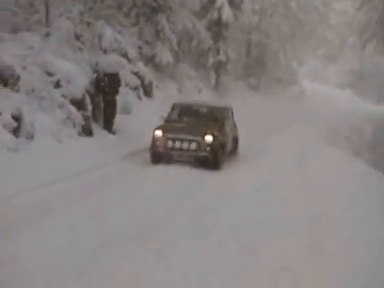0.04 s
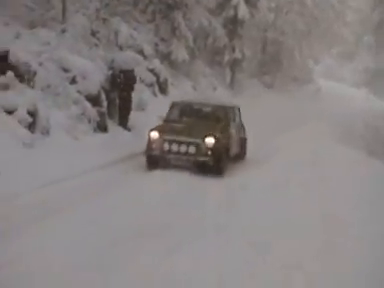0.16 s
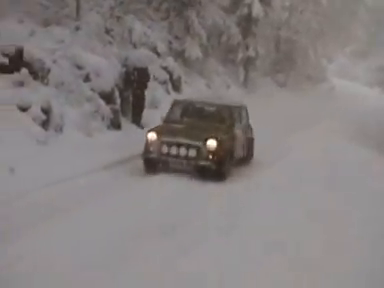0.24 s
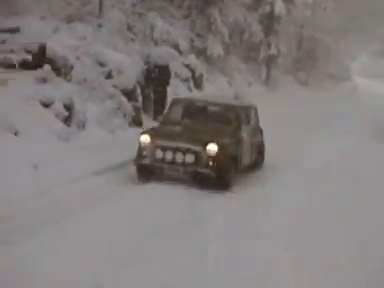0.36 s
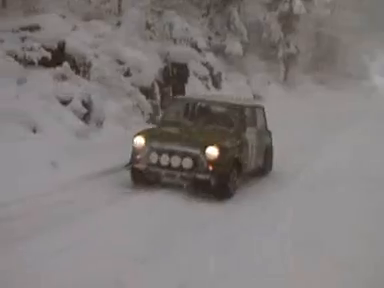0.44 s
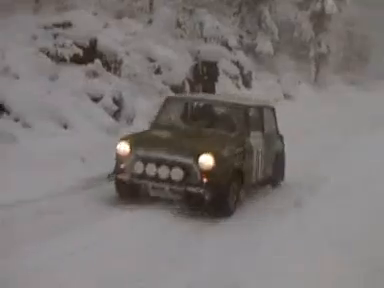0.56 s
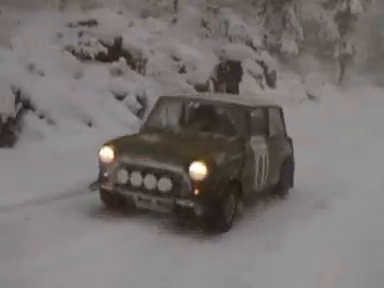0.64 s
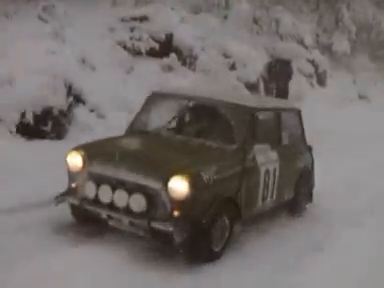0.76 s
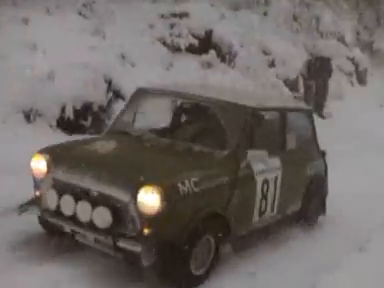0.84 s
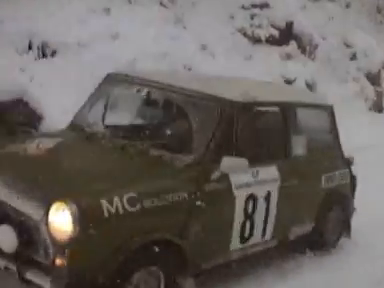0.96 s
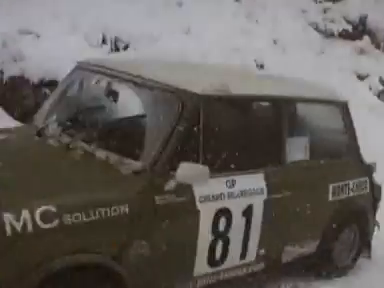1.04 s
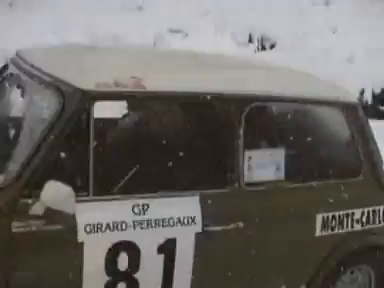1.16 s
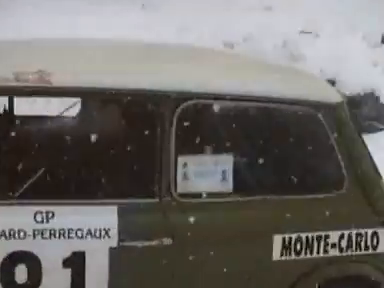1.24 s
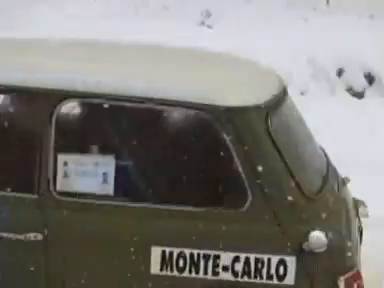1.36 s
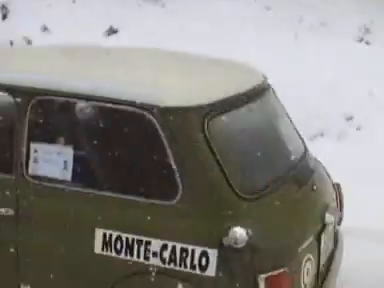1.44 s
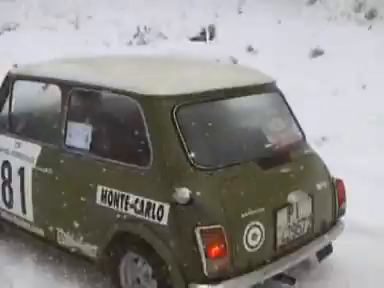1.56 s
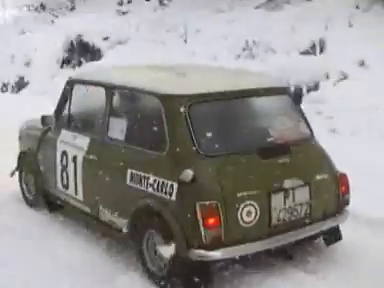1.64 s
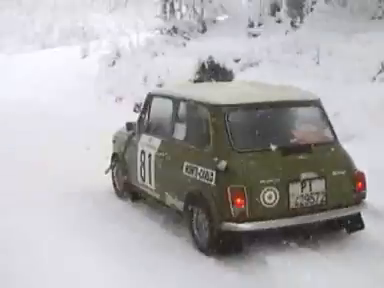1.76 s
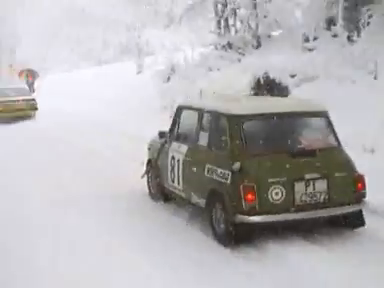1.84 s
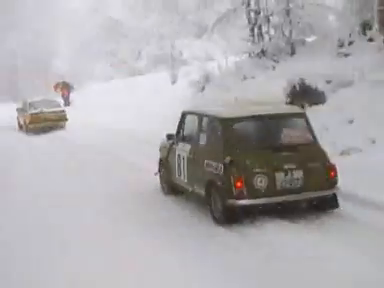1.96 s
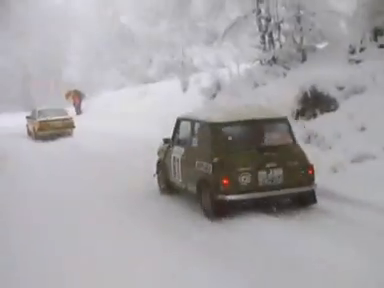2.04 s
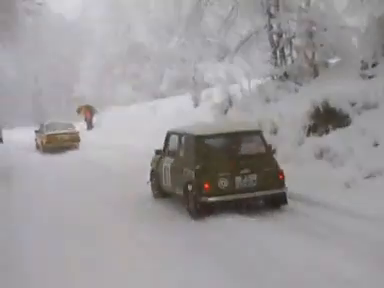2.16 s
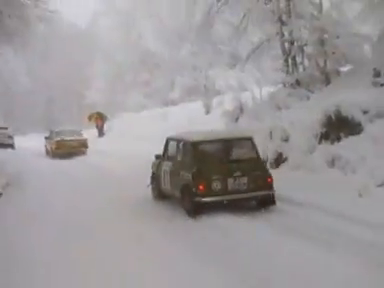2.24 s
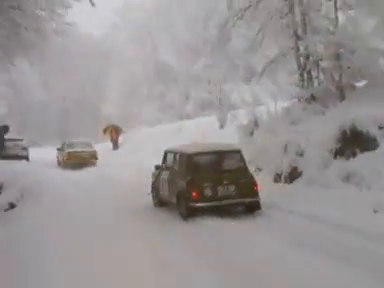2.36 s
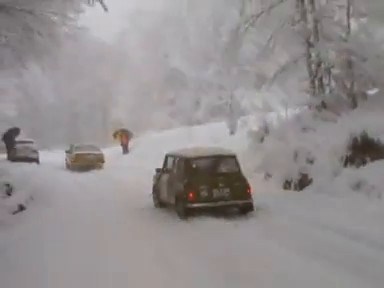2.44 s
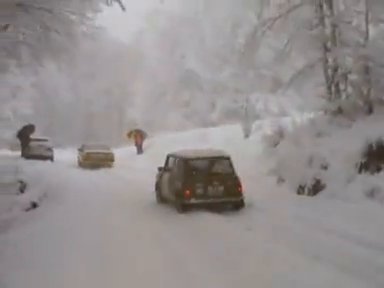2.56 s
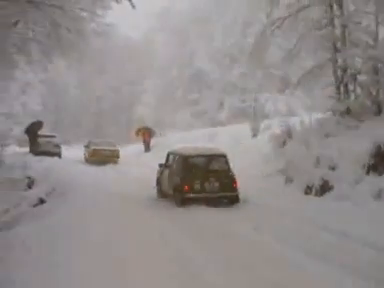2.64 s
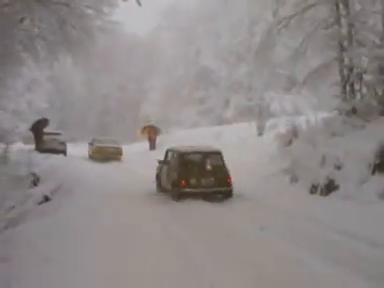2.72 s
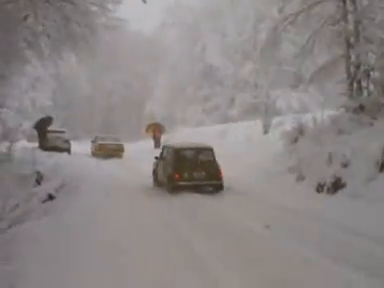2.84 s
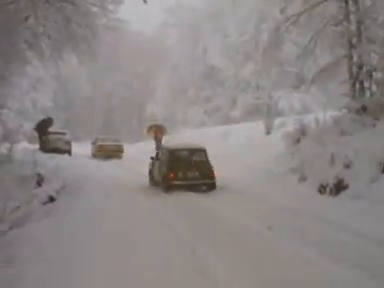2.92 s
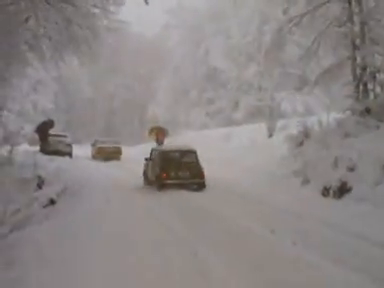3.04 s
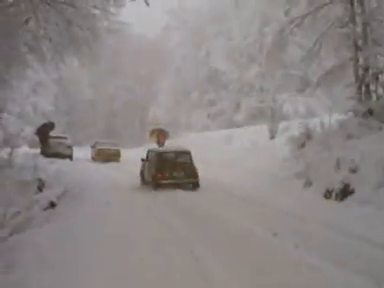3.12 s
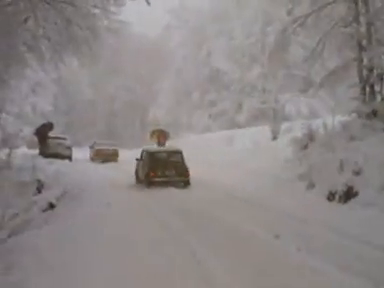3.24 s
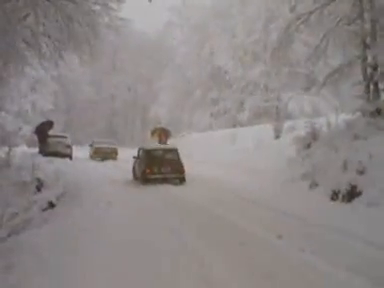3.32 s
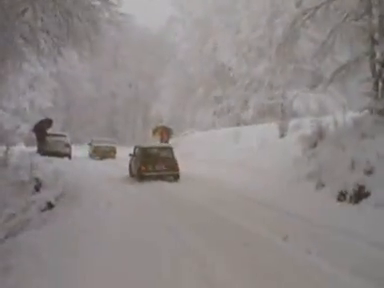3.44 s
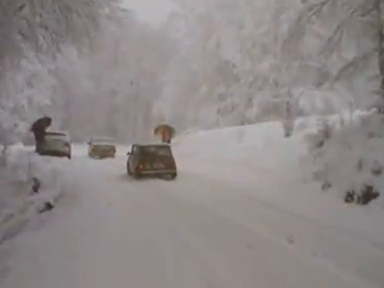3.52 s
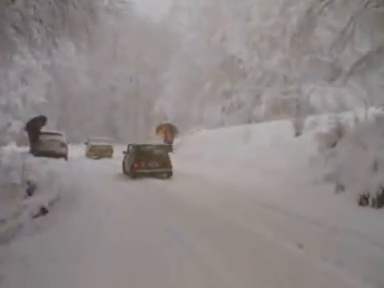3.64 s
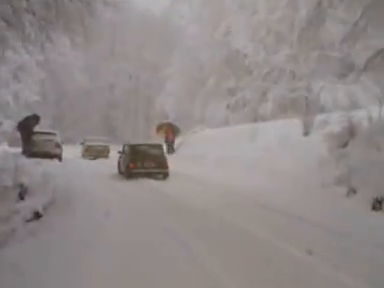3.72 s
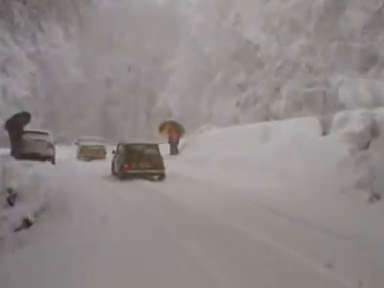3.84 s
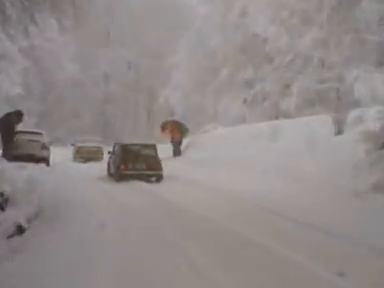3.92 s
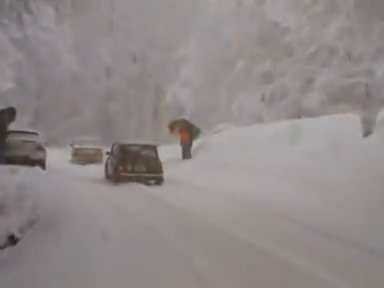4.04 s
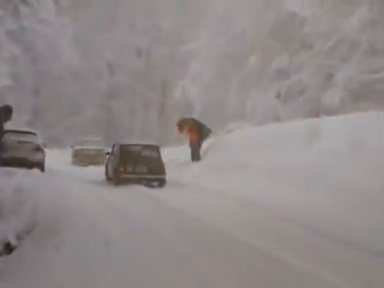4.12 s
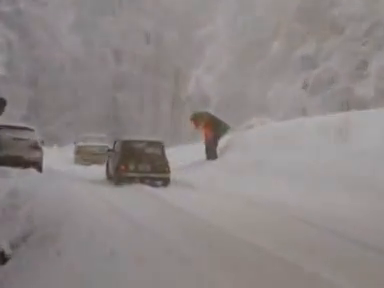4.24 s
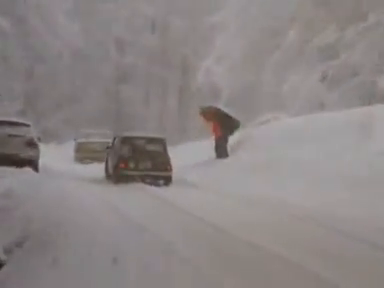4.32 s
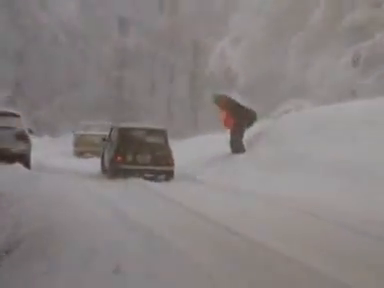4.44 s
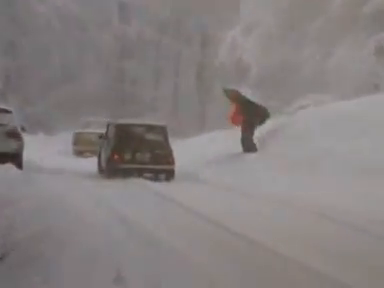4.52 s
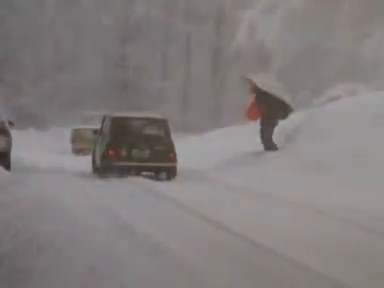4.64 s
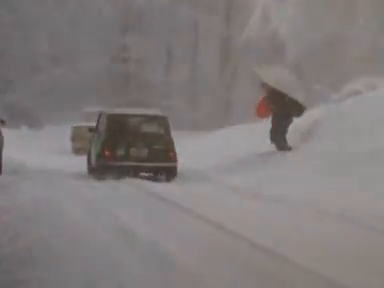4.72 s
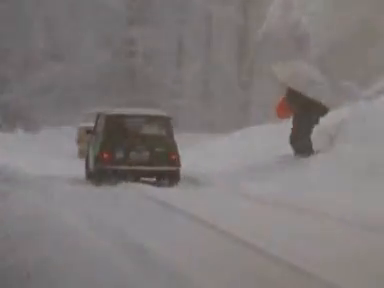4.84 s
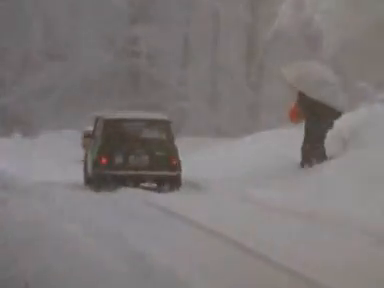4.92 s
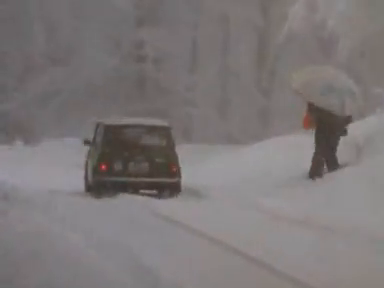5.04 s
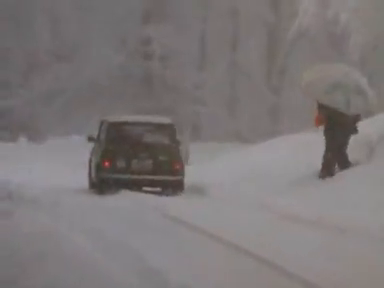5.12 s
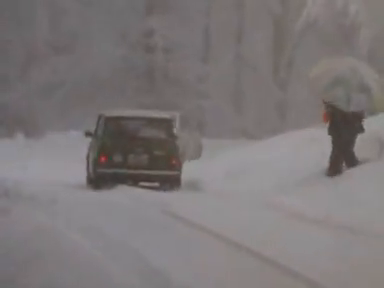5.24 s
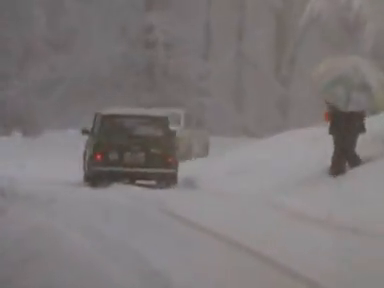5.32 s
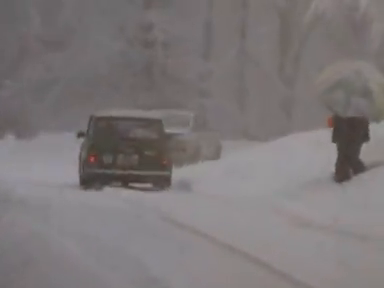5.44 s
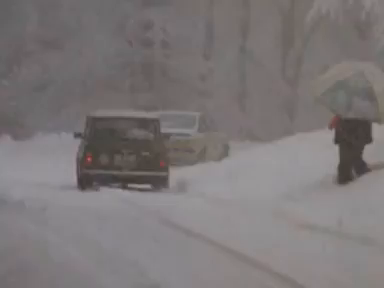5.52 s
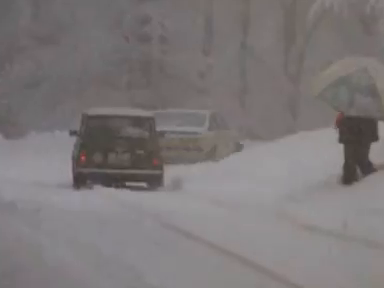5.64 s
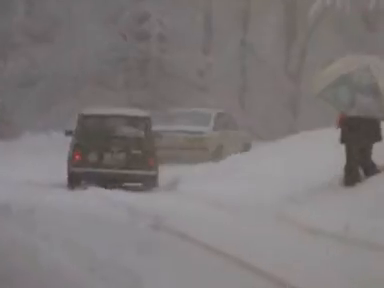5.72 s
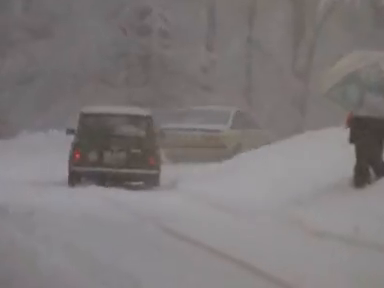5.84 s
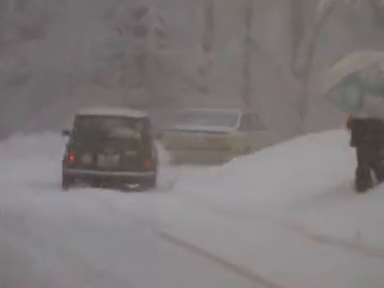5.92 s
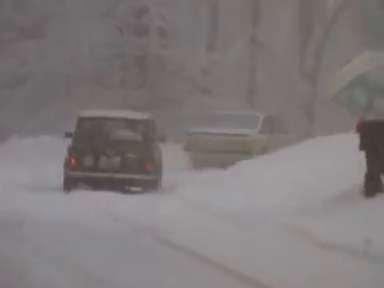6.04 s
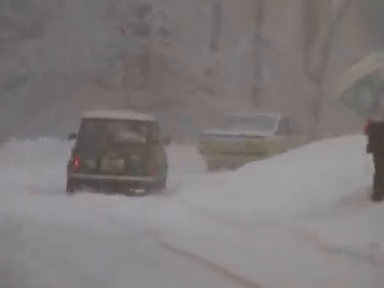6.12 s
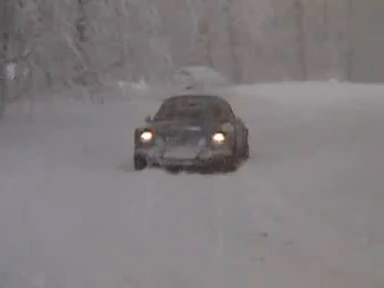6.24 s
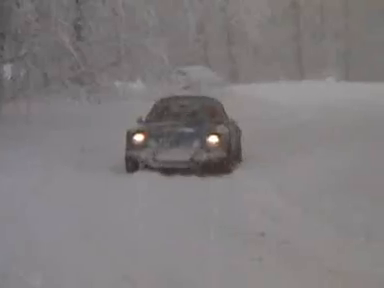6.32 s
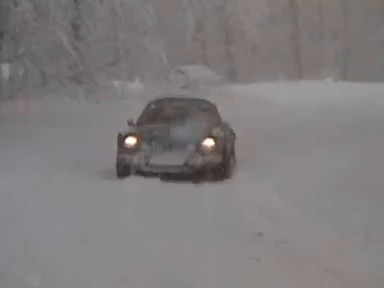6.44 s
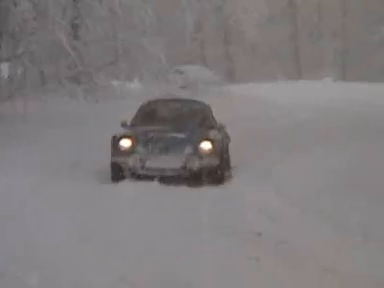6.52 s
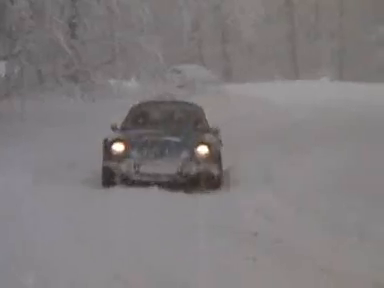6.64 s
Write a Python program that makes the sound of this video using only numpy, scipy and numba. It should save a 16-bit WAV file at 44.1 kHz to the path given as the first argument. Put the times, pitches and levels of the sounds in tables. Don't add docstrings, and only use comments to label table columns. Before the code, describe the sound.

Low raspy four-cylinder drones throb against each other, swell with gear whine and snow hiss, drop away, then cut to a distant higher engine.

```python
import sys
import numpy as np
from scipy import signal
from scipy.fft import irfft, next_fast_len
from scipy.io import wavfile
from scipy.ndimage import uniform_filter1d
from numba import njit

SR = 44100
rng = np.random.default_rng(int(sys.argv[2]) if len(sys.argv) > 2 else 0)


def store_pcm(level_fs):
    pcm = np.round(np.clip(level_fs, -1, 1) * 32767).astype(np.int16)
    wavfile.write(sys.argv[1], SR, np.atleast_2d(pcm).T)


def volts(x):
    e = np.asarray(x, float) / 20
    return 10 ** e


N = 294147
T = np.arange(N) / SR

CRANK = (.73, .83, .18)
# time of one crack in seconds, level against the
# note in dB, width in seconds.
CRACKS = [
    (.2163, 4, .00042),
    (2.7066, -10, .0004),
]


def curves(table):
    times, *columns = np.transpose(table)
    return [np.interp(T, times, column) for column in columns]


def walk(rate):
    hold = int(SR / rate)
    steps = np.repeat(rng.standard_normal(N // hold + 1), hold)
    return uniform_filter1d(uniform_filter1d(steps, hold), hold)[:N]


def band(hz, octaves):
    size = next_fast_len(N)
    f = np.arange(1, size // 2 + 2) * SR / size
    bell = np.exp(-(np.log2(f / hz) / octaves) ** 2)
    phase = np.exp(2j * np.pi * rng.random(len(f)))
    noise = irfft(bell * phase * rng.rayleigh(size=len(f)), size)[:N]
    return noise / noise.std()


def bumps(table):
    return sum(db * np.exp(-((T - s) / length) ** 2) for s, length, db in table)


def peaks(hz, table):
    return sum(db * np.exp(-(np.log2(hz / f) / octaves) ** 2) for f, octaves, db in table)


def gate_of(db):
    return 1 / (1 + np.exp(-np.clip(db, -30, 30)))


def engine(rate, crank, heard, pipe, lag, waver_db, jitter, boom_db=0):
    hz, = curves(rate)
    running = T >= rate[0][0]
    angle = 2 * np.pi * (crank + np.cumsum(hz * running) / SR)
    note_db, octave_db = curves(heard)
    upper_db = 2 + 0.58 * octave_db
    out, shake = 0, walk(25)
    for order, db in pipe:
        order = np.round(order * 4) / 4
        spread = np.abs(order - 1)
        late = lag * spread if order % 1 == 0 else 2 * np.pi * rng.random()
        if order == 2:
            db = octave_db
        else:
            boom_share = (order == 3) + .35 * (order > 3)
            db = db + (order > 2) * upper_db + boom_db * boom_share
        db = db + waver_db * min(spread + .2, 2.) * (.7 * walk(14) + .5 * walk(45))
        out = out + volts(db) * np.cos(order * angle - late + jitter * spread * shake)
    return np.sqrt(2) * volts(note_db) * out, angle


def cracks(angle, heard, s, db, width_s):
    turns = (angle - angle[int(s * SR)]) / (2 * np.pi)
    age = ((turns + 1) % 2 - 1) / (np.gradient(turns) * SR * width_s)
    strong = np.where((turns + 1) % 4 < 2, 1, .55)
    note_db, rasp_db = curves(heard)
    level_db = note_db + db + .4 * np.minimum(rasp_db, -2) + 2.5 * walk(30)
    return strong * (age - .7) * np.exp(-age ** 2 / 2) * volts(level_db)


def first_car():
    # time in seconds, firing rate in Hz.
    firing = [(0.0, 103.46), (0.44, 98.47), (0.78, 96.77), (0.88, 94.3), (1.61, 91.87), (3.77, 89.58),
              (4.3, 88.11), (4.54, 86.36), (4.76, 90.69), (4.93, 86.93), (5.25, 88.14), (5.44, 86.8),
              (5.59, 88.92), (6.29, 84.27)]
    # time in seconds, note level in dB, rasp (octave against the note) in dB.
    heard = [(0, -7.5, 4), (.17, -3.5, -1), (.45, -4.5, -4), (.85, -9.5, -5), (1.19, -13.5, -7.5),
             (1.36, -29, -4), (1.7, -17.5, -6), (2.2, -21.5, 1), (2.4, -16, -9), (2.85, -21.5, -10),
             (3.1, -25, -14), (3.4, -29, -8.5), (4.2, -34, -6.5), (5.1, -38, 0), (6.29, -42, -8)]
    # multiple of the firing rate, level in dB.
    pipe = [(0.5, -27), (0.75, -24), (1.0, 2.5), (1.25, -16), (1.5, -15.5), (1.75, -40.5), (2.0, -9),
            (2.25, -17), (2.5, -15), (2.75, -24), (3.0, -15.5), (3.25, -23.5), (3.5, -17.5), (3.75, -33),
            (4.0, -20.5), (4.25, -23.5), (4.5, -26), (4.75, -27), (5.0, -29), (5.25, -53), (5.5, -38.5),
            (5.75, -23.5), (6.0, -29.5), (6.25, -29), (6.5, -55), (6.75, -40.5), (7.0, -48)]
    note, angle = engine(firing, CRANK[0], heard, pipe, lag=.6, waver_db=1., jitter=.06)
    return note + cracks(angle, heard, *CRACKS[0]), angle


def second_car():
    # time in seconds, firing rate in Hz.
    firing = [(0.0, 112.11), (0.72, 115.4), (1.11, 111.07), (1.39, 113.16), (1.76, 101.11), (2.08, 100.08),
              (2.39, 105.71), (2.95, 109.64), (3.06, 108.34), (3.27, 100.86), (4.07, 96.81), (4.66, 97.19),
              (5.86, 95.02), (6.29, 100.27)]
    # time in seconds, note level in dB, rasp (octave against the note) in dB.
    heard = [(0, -19, -16), (.38, -14.5, -11), (.75, -7.5, -24), (1.14, -4, -15.5), (1.2, -3, -5),
             (1.551, 2.5, -10.5), (1.8, 0.5, -7), (2.2, -1, -4), (2.8, -5.5, -6), (3.02, -9.5, -6),
             (3.27, -21, -6), (3.5, -21, -13), (4.5, -22, -10.5), (4.95, -23, -10.5), (5.15, -28, -10.5),
             (5.55, -27.5, -8.5), (6.29, -28.5, -4)]
    # multiple of the firing rate, level in dB.
    pipe = [(.5, -41.5), (1, 0), (1.25, -36), (1.5, -22), (1.75, -29), (2, -6), (2.5, -32.5), (2.75, -31.5),
            (3, -23.5), (4, -19), (4.5, -27), (5, -22), (5.5, -28), (6, -31), (6.75, -36.5)]
    # middle in seconds, length in seconds, lift in dB.
    boom = [
        (1.3, 0.28, 10.5),
        (2.1, 0.17, 5.5),
    ]
    note, angle = engine(firing, CRANK[1], heard, pipe, lag=1.05, waver_db=1., jitter=.06,
                         boom_db=bumps(boom))
    return note + cracks(angle, heard, *CRACKS[1]), angle


def third_car():
    # time in seconds, firing rate in Hz.
    firing = [(6.29, 121.76), (6.417, 118.71), (6.543, 117.45), (6.67, 118.07)]
    # time in seconds, note level in dB, rasp (octave against the note) in dB.
    heard = [(6.29, -32, -11), (6.42, -30.5, -8.5), (6.67, -31.5, -6)]
    # multiple of the firing rate, level in dB.
    pipe = [(.5, -27), (.75, -28), (1, 0), (1.25, -28), (1.5, -15), (1.75, -28), (2, -7), (2.5, -28),
            (3, -20), (3.5, -30), (4, -16), (4.5, -30), (5, -17), (6, -25), (7, -30), (10, -28)]
    return engine(firing, CRANK[2], heard, pipe, lag=2.4, waver_db=1.5, jitter=.07)


def rush(angle, keep_db):
    # time in seconds, level in dB, wheelspin 0-1, tailpipe facing the microphone 0-1.
    loudness = [(0, -24.5, 0.64, 0.5), (.28, -26, 0.51, 0.73), (.47, -27, 1, 0.55), (.54, -23, 0.77, .3),
                (.87, -23.5, 1.1, 0.56), (1.19, -19.5, 0.9, 0.41), (1.36, -20.5, 0.6, 0.7),
                (1.5, -25.5, 0.9, 0.85), (1.75, -27, 0.91, 1), (1.9, -27.5, 0.5, 0.85),
                (2.2, -26, 0.43, .5), (2.45, -29, 0.2, 0.72), (2.95, -33, 0.31, 0.6),
                (3.15, -40, 0.01, 0.45), (3.8, -42, 0.07, 0), (6.28, -47.5, 0.17, 0.38),
                (6.3, -45, 0.62, 0.3), (6.67, -45, 0.58, 0.25)]
    # level in dB, dB gained at full wheelspin,
    # dB gained behind the tailpipe.
    layers = [
        (-5, 0.65, 11),
        (0, 0.5, 0),
        (-9.5, 8.5, -1.24),
        (-23.5, 8.5, 4.5),
    ]
    centres = (500, 1500, 4200, 9000)
    # pitch in Hz, level in dB per Hz.
    tint = [(25, -20), (50, -6.5), (70, -2.5), (150, -1), (330, -2), (600, -1.5), (850, -5), (1200, -11),
            (1900, -11.5), (2500, -14.5), (4500, -14), (7000, -27), (9000, -36), (12000, -47.5)]
    # pitch in Hz, width in octaves, lift in dB.
    ground = [(825, 0.15, -13), (1120, 0.23, 0), (1436, 0.081, -12), (1770, 0.058, 0.5), (2450, 0.43, -2.5),
              (2893, 0.062, 10)]
    # pitch in Hz, width in octaves, lift in dB.
    body = [
        (1110, 0.32, 5),
        (1650, 0.25, -4.5),
    ]
    # middle in seconds, length in seconds, lift of the spray in dB.
    sprays = [
        (2.05, 0.13, 1.5),
        (2.55, .06, 7.5),
        (2.95, 0.15, 3),
        (6.47, 0.026, 0.5),
    ]
    gate = .28
    unlike_from_db = -9 * 0 - 3

    level_db, spin, tailpipe = curves(loudness)
    levels = [level_db + db + spin * spin_db + tailpipe * pipe_db for db, spin_db, pipe_db in layers]
    levels[-1] = levels[-1] + bumps(sprays)
    tint_hz, tint_db = np.transpose(tint)

    def colour(hz):
        return np.interp(np.log(hz), np.log(tint_hz), tint_db) + 10 * np.log10(hz)

    far = np.clip((T - 1.8) / 1.2, 0, 1)
    alongside = np.exp(-((T - 1.25) / 0.3) ** 2)
    facing = .6 + .75 * np.exp(-((T - 2.1) / .45) ** 2) - .3 * far
    uneven = 1 + .5 * np.cos(angle / 2 - .25)
    puff = facing * uneven * (np.exp(1.5 * np.cos(angle - .5)) - 1.65) / 1.6
    mid, side, swell, crunch = 0, 0, walk(2.66), walk(18)
    for hz in 28 * 2 ** (np.arange(36) / 4):
        share = [np.interp(np.log(hz), np.log(centres), row) for row in np.eye(4)]
        db = sum(w * (level - colour(c)) for w, level, c in zip(share, levels, centres))
        db = db + colour(hz) - 3
        db = db + far * peaks(hz, ground) + alongside * peaks(hz, body)
        high = np.clip(hz / 3000, 0, 1)
        db = db + .3 * swell + 1.3 * walk(10)
        db = db + 1.2 * high * crunch * (1 - .6 * far)
        gain = volts(db) * (1 + gate * max(high, 0.65 * (hz > 350)) * puff)
        mid = mid + gain * band(hz, 0.23)
        gain = gain * volts(2 * np.log2(hz / 1000))
        wide = gate_of(keep_db + 9 * walk(8) - unlike_from_db + 40 * (hz < 900))
        side = side + gain * band(hz, .12) * wide
    return mid, side


def whines():
    # time in seconds, pitch in Hz, level in dB.
    gear = [
        (.3, 770, -70),
        (.5, 765, -38),
        (.82, 765, -22),
        (1.05, 733.6, -16.5),
        (1.23, 713, -21),
        (1.4, 732, -30),
        (1.6, 706, -50),
    ]
    # start in seconds, end in seconds, pitch in Hz, level in dB.
    distant = [
        (3.6, 4.65, 2336, -59),
        (5.1, 5.55, 2309, -58),
        (4.5, 6.3, 4554, -64),
        (3.3, 6.3, 5058, -66),
        (3.3, 6.2, 110, -44),
        (6.43, 6.5, 620, -45),
    ]
    hz, db = curves(gear)
    turning = (T > gear[0][0]) * (T < gear[-1][0])
    phase = 2 * np.pi * np.cumsum(hz) / SR + 0.86 * walk(60.24)
    out = volts(db + 2.3 * walk(13.3)) * np.sin(phase) * turning
    for start, end, hz, db in distant:
        on = np.clip(np.minimum(T - start, end - T) / 0.014, 0, 1)
        phase = 2 * np.pi * np.cumsum(hz * (1 + .0007 * walk(20))) / SR
        out = out + on * volts(db + 2.5 * walk(20)) * np.sin(phase)
    return np.sqrt(2) * out


def knocks():
    # time in seconds, peak in dB, pitch in Hz, time to fall by 60 dB in seconds. The first three are
    hits = [(2.669, -9, 620, .035), (2.705, -14, 650, .035), (2.818, -10, 620, .04),
            (4.138, -40, 2340, .03), (4.78, -36, 2000, .06), (5.184, -35, 1240, .1), (5.215, -36, 1150, .1),
            (5.24, -35, 1290, .1), (5.519, -39, 1150, .03), (6.357, -27, 1500, .02),
            (6.357, -28, 800, .025), (6.462, -27, 620, .06), (6.468, -34, 4100, .03),
            (6.47, -39, 6500, .03), (6.49, -35, 3000, .015)]
    out = np.zeros(N)
    for s, db, hz, t60 in hits:
        age = np.clip(T - s, 0, 1)
        ring = np.sin(2 * np.pi * hz * age + hz / 800 * walk(400))
        out += volts(db) * ring * np.minimum(age / .002, 1) * volts(-60 * age / t60)
    return out


def wind():
    # middle in seconds, length in seconds, lift in dB.
    gusts = [
        (1.41, .1, 16),
        (2.15, .15, 8),
        (3.1, .1, 0),
        (6.67, .5, 10),
    ]
    level_db = np.maximum(-27 - 9.5 * T, -58) + bumps(gusts)
    return volts(level_db + 2.5 * walk(8.3)) * band(40, 0.84)


def tape_drive():
    return volts(-55 + 2.5 * walk(8)) * np.sin(2 * np.pi * 580 * T)


def scene():
    # time in seconds, left minus right in dB,
    # lead of the left port in the bass in radians.
    ports = [(0, 1.5, 0.12), (.55, 0.5, 0.2), (.72, -1, 0.1), (1.7, -0.1, 0.13), (2.9, -0.9, 0.08),
             (3.4, -0.8, 0.17), (6.28, -1.5, .16), (6.3, 1, .08), (6.67, 1.5, .07)]
    # middle in seconds, length in seconds, depth in dB.
    folds = [
        (.55, 0.074, -33),
        (.93, 0.23, -19),
        (2.0, 0.32, -32),
        (2.75, 0.25, -6),
    ]
    change_s = 6.288
    first, first_angle = first_car()
    second, second_angle = second_car()
    third, third_angle = third_car()
    after = np.clip((T - change_s) / 0.0066, 0, 1)
    exhaust = (first + second) * (1 - after) + third * after

    angle = np.where(T < 1.0, first_angle, np.where(T < change_s, second_angle, third_angle))
    (pan_db, lead), keep_db = curves(ports), bumps(folds)
    mid, side = rush(angle, keep_db)
    bass = signal.sosfiltfilt(signal.butter(2, 260, fs=SR, output="sos"), exhaust)
    quarter_turned = signal.hilbert(bass, next_fast_len(N))[:N].imag
    side = side * volts(-14.5) - lead / 2 * quarter_turned + tape_drive()
    mid = mid + exhaust + whines() + knocks() + wind()
    low = signal.sosfiltfilt(signal.butter(4, 1500, fs=SR, output="sos"), mid)
    panned = low + gate_of(keep_db + 6) * (mid - low)
    side = side + np.tanh(pan_db * np.log(10) / 40) * panned
    return np.array([mid + side, mid - side])


@njit
def follow(x, attack, release):
    e, out = abs(x[0]), np.empty(len(x))
    for i in range(len(x)):
        e += (abs(x[i]) - e) * (attack if abs(x[i]) > e else release)
        out[i] = e
    return out


def roll_off(x):
    return signal.sosfilt(signal.butter(12, 12790, fs=SR, output="sos"), x)


def record(dry):
    strip_hz = (11700, 12200, 12800)
    limit_db, ratio, attack_s, release_s = -11.4, 2.5, .006, .02
    envelope = follow(dry.mean(0), 1 / (attack_s * SR), 1 / (release_s * SR))
    x = dry * np.minimum(volts(limit_db) / (envelope + 1e-9), 1) ** (1 - 1 / ratio)
    lows = [signal.sosfiltfilt(signal.ellip(8, .1, 50, hz, fs=SR, output="sos"), x) for hz in strip_hz]
    x = lows[0]
    for lower, upper, bias in zip(lows, lows[1:], (4, -3)):
        x = x + gate_of(8 * walk(9) + bias) * (upper - lower)
    x = np.clip(x + .006, -1, 1)
    return roll_off(x)


dry = scene()
out = record(dry)
store_pcm(out)
```